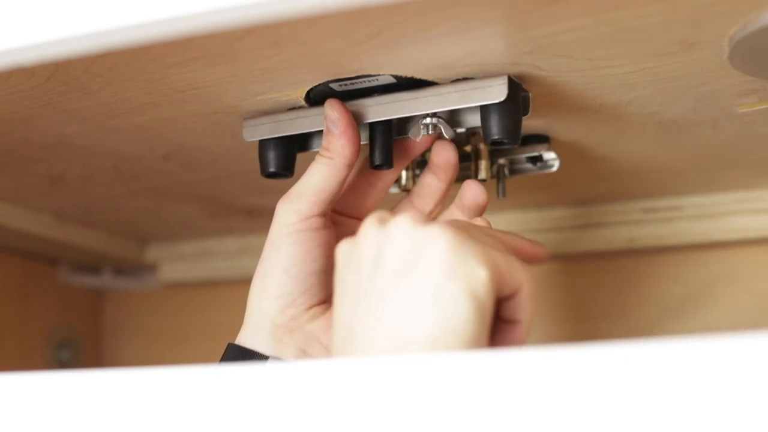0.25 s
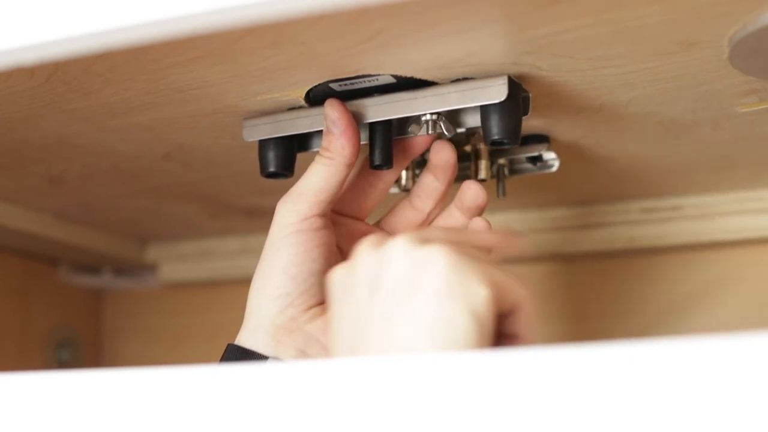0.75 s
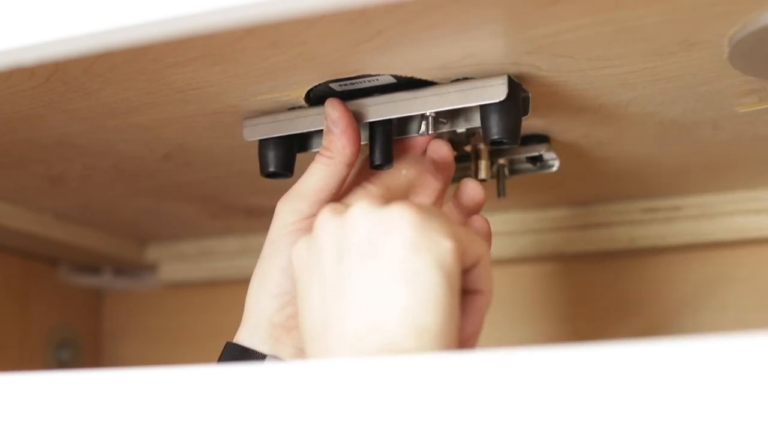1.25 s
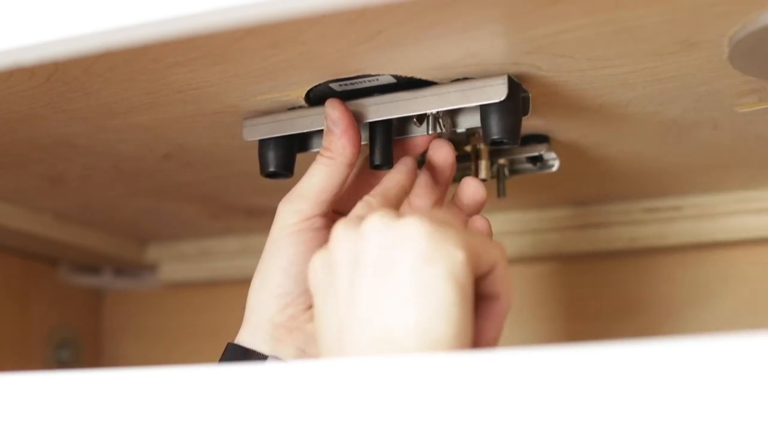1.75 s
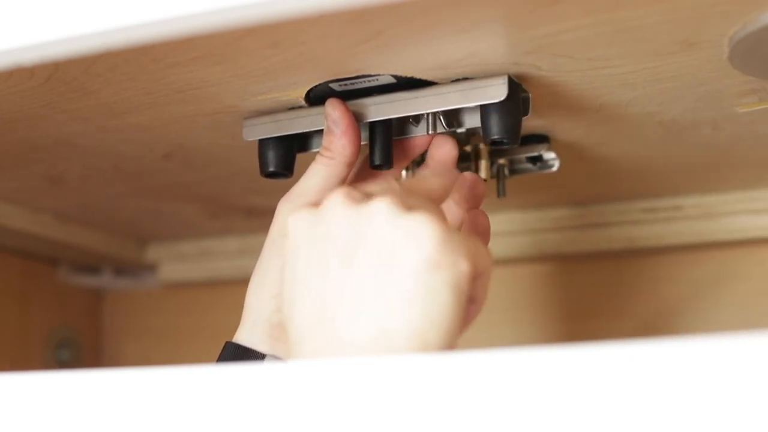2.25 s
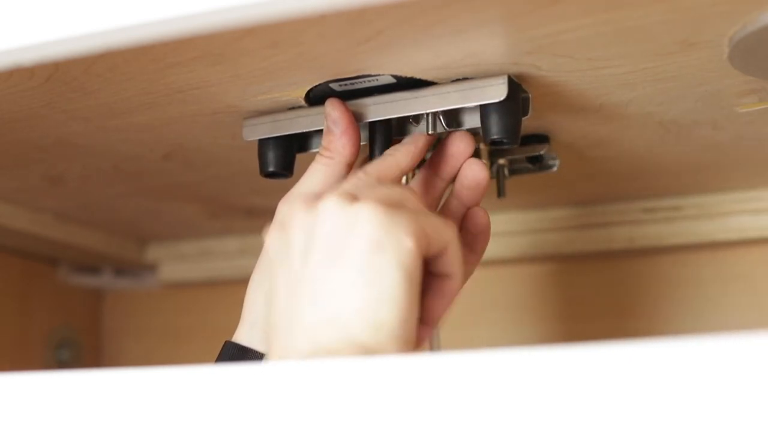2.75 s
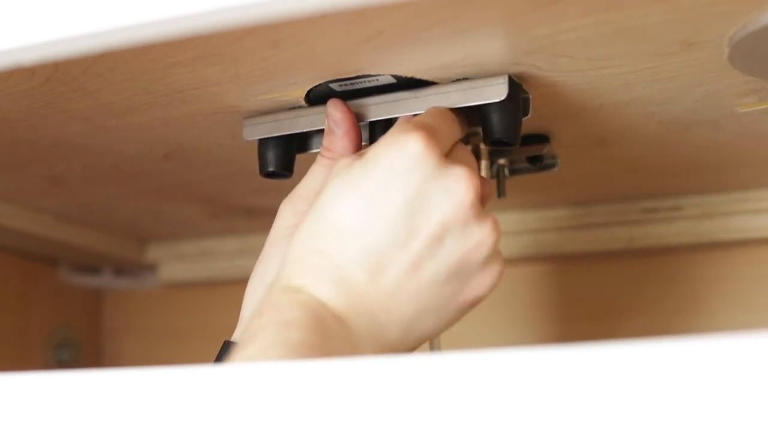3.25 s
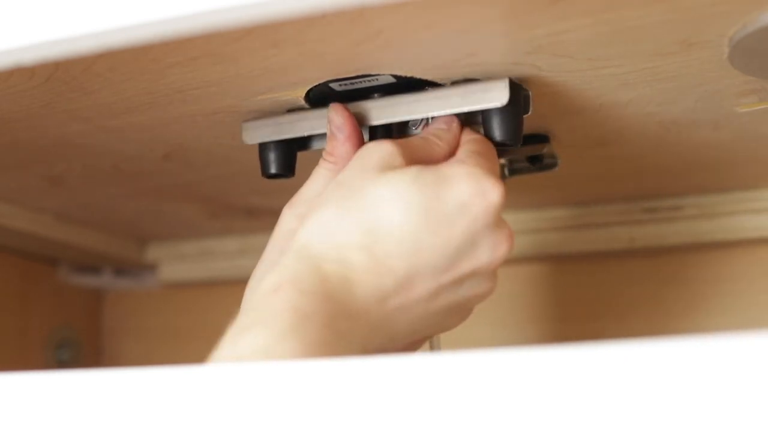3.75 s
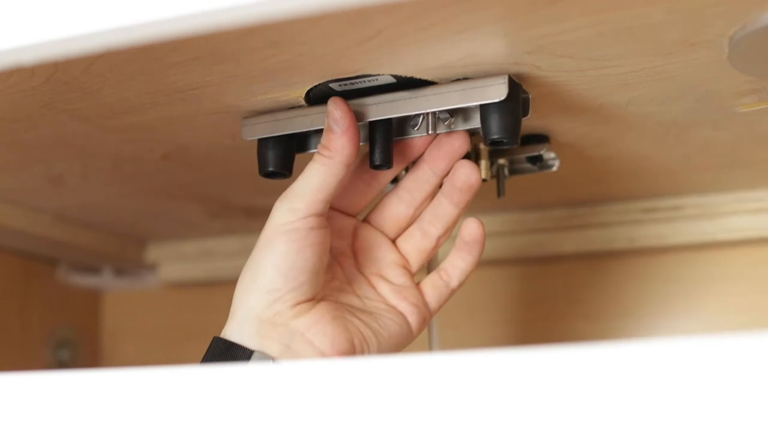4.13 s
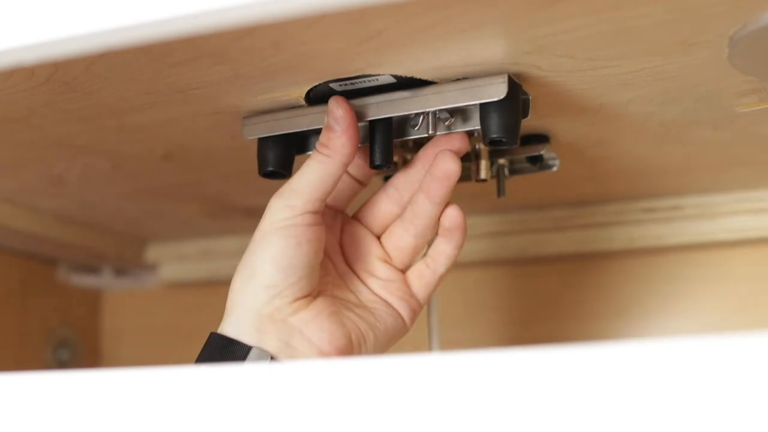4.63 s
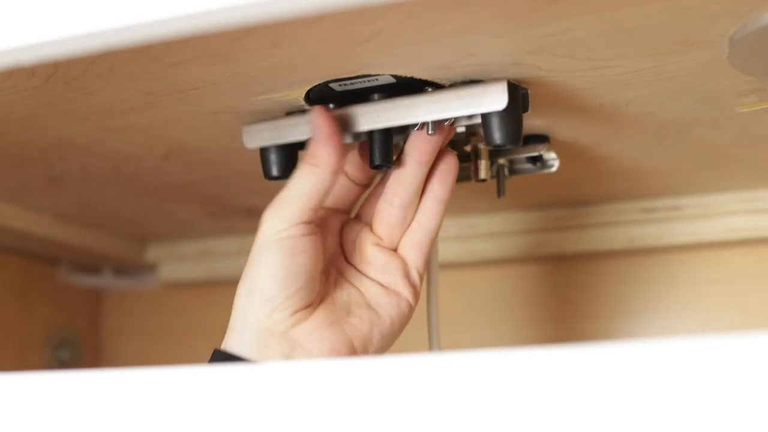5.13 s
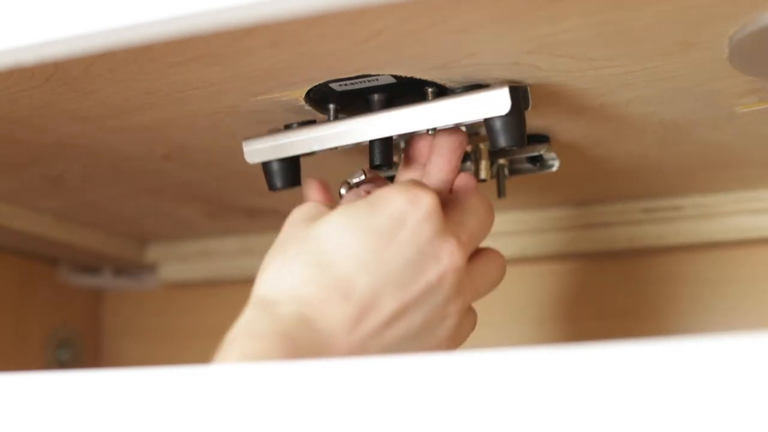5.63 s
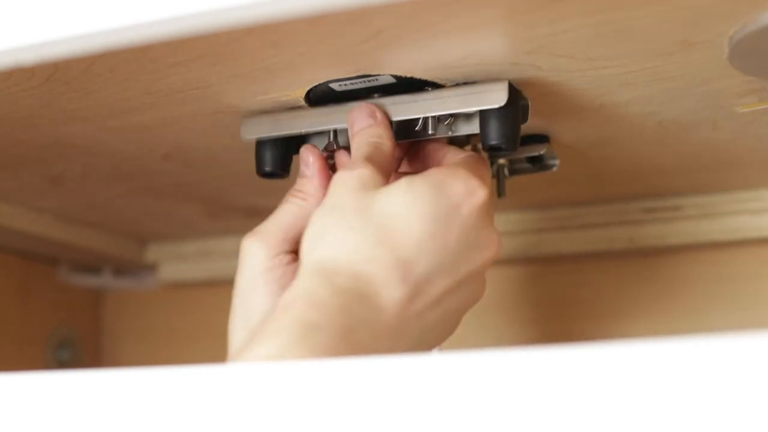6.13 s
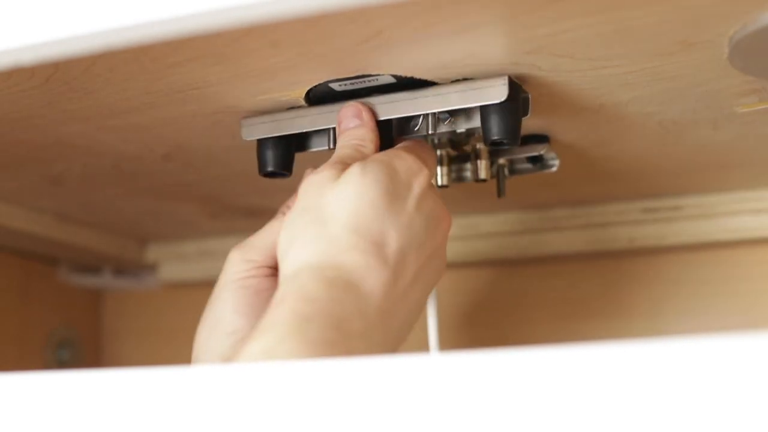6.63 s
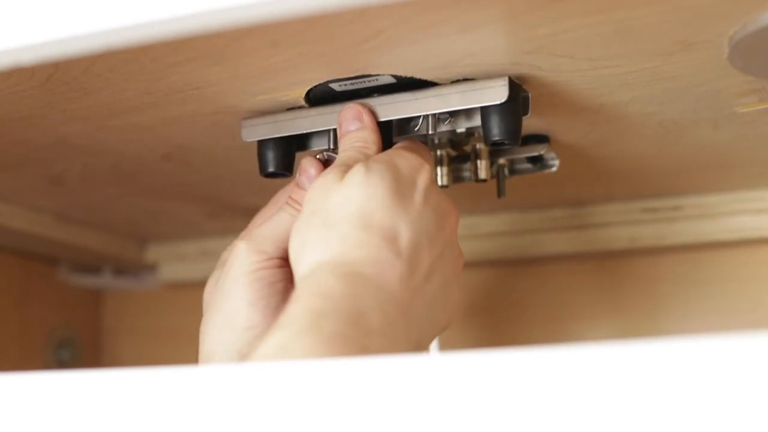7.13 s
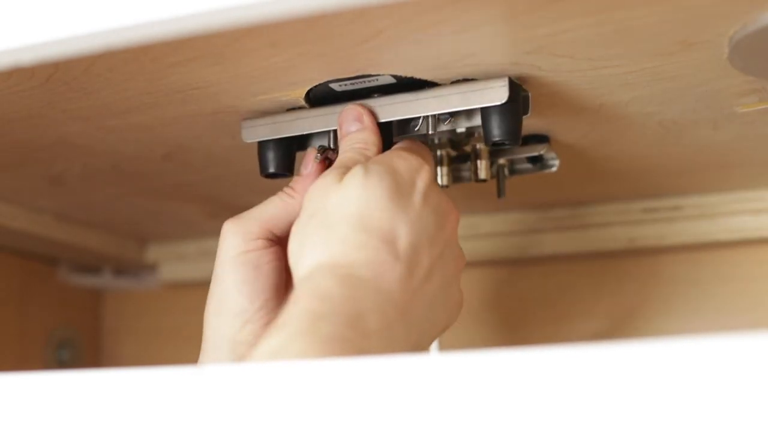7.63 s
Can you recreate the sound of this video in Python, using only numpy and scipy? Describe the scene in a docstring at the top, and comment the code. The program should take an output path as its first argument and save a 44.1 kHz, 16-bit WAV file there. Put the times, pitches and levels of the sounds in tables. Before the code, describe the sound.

A quiet room with faint low hum and slight hiss, heard close in mono with boxy wooden resonance. The tail of a nut rattle opens at 0 s. Flicks click at about 0.2 and 0.3 s, with a bright run coasting to 0.5 s; shorter metallic bursts follow near 0.7, 1.2, 1.6 and 2.1 s, with light knocks around 1.7 s. From 2.2 to 3.5 s there are mostly soft finger scuffs and faint taps. Hollow plate knocks cluster at 3.5-3.85 s, another lands at 4.25 s, then near quiet with light rubbing. From 5.1 to 6.3 s the loose plate clatters irregularly against wood, with dull hand thumps and scuffing, strongest at 6.2 s with quick rebounds. A softer knock comes at 6.5 s. Afterwards only faint clicks around 7.2-7.7 s, tiny nut movements, light scuffs and a modest knock at 7.85 s.

```python
"""A faint low hum in a quiet room and the brief rattle of a wing nut coasting, then flicks, more runs and knocks.
The nuts are spun by hand on the bolts of a steel mounting plate under a wooden cabinet top.
Flicked nuts click, gather speed and coast along the thread; hands bump and fingers scuff the hardware.
The loose plate knocks and rebounds on its bolts. Noise forces and tiny impacts drive resonant bodies of
wood and steel; the wooden panels sound along with every contact."""
import sys
import numpy as np
from scipy import signal
from scipy.fft import rfft, irfft
from scipy.io import wavfile

SR = 44100
rng = np.random.default_rng(int(sys.argv[2]) if len(sys.argv) > 2 else 0)


def generate_wav(sig):
    """Save sig (samples, or channels by samples) to the path in sys.argv[1] as 16-bit PCM at SR."""
    pcm = np.round(np.clip(np.atleast_2d(sig).T, -1, 1) * 32767).astype(np.int16)
    wavfile.write(sys.argv[1], SR, pcm)


N = 347508
TIME_S = np.arange(N) / SR

# nominal resonances of cabinet, wing nut, plate: (centre [Hz], width [Hz], rise over the colour [dB])
CABINET_MODES = [(297, 3.4, 9.5), (376.3, 21.4, 10.5), (438.8, 15, 18), (520, 11, -1), (662.8, 25.7, 14),
                 (720, 77, 6), (877, 17, 15.5), (1030, 30, 8.5), (1081.3, 28, 14), (1456, 87, 10.5),
                 (2013, 87, 4.5), (2347, 54, 6)]
NUT_MODES = [(2400, 100, 4), (4030, 56, 16.5), (5560, 110, 6), (5870, 45, 7), (6935, 38, 17.5),
             (7760, 100, 9), (8060, 110, 6), (9100, 100, 6), (11400, 130, 9), (11750, 90, 9),
             (12200, 80, 12.5), (12540, 90, 9), (13600, 70, 8), (15300, 60, 8), (15680, 70, 12)]
PLATE_MODES = [(1470, 55, 6), (1780, 47, 7), (2130, 70, 5), (3250, 73, 4), (3980, 88, 4), (5280, 150, 5),
               (5620, 45, 16), (6170, 95, 9), (6660, 60, 6), (6870, 50, 7), (7560, 140, 7), (11800, 140, 7),
               (12500, 300, 6), (13200, 65, 6), (14500, 180, 5), (15000, 190, 5)]
# broad responses of nut, plate, rubbed panel, rubbed steel, bumped panel, room: (frequency [Hz], relative level [dB])
NUT_COLOUR = [(60, -5.5), (190, -11), (400, -1), (800, 0.5), (1250, -8), (2400, -7), (3300, -9.5),
              (4300, -4), (4900, -10), (5700, -1), (8800, -3.5), (10200, -12.5), (11600, -5.5),
              (16000, -10)]
PLATE_COLOUR = [(60, -16), (190, -10), (400, -3), (750, -3.5), (1100, -13), (1700, -19), (2400, -21),
                (3200, -27), (4800, -28), (5900, -24.5), (7000, -27.5), (9500, -33), (16000, -30.5)]
RUB_COLOUR = [(60, -33), (200, 3.5), (420, -4.5), (900, -12), (1800, -11), (3500, -26), (6000, -28),
              (9000, -45), (16000, -29)]
WHISPER_COLOUR = [(300, -54), (1000, -0.5), (1500, 11.5), (2500, 6), (3600, -1), (4800, 0.5), (6200, -8),
                  (7800, -3), (9500, -22), (16000, 3)]
BUMP_COLOUR = [(25, -28.5), (60, -6), (92, -1.5), (120, -4), (185, -30.5), (230, -16), (400, -23.5),
               (1500, -75.5)]
ROOM_COLOUR = [(20, -22), (35, -6), (58, -5.5), (95, -3), (140, -19), (200, -23), (330, -27), (600, -29),
               (1200, -35.5), (2500, -41.5), (5000, -46), (16000, -48)]
# nut runs: (time at full speed [s], steel ring [dB], spin-up [s], coasting [s])
RUNS = [(0.0, -45.5, .02, 0.042), (0.233, -42.5, 0.015, .05), (0.291, -32.5, 0.074, 0.17),
        (0.714, -34.5, 0.043, 0.1), (1.169, -27.5, 0.034, 0.027), (1.614, -38, 0.067, 0.0033),
        (2.124, -33, 0.02, 0.013), (7.47, -55, 0.03, 0.022), (7.792, -59.5, 0.067, 0.0043)]
# finger flicks on a nut: (time [s], wood [dB], steel ring re wood [dB], panel pitch [Hz])
FLICKS = [(0.1744, -33.5, -2.5, 426), (0.284, -38, 11, 710), (0.328, -37.5, 3, 726), (0.396, -39, 0, 726),
          (0.612, -48.5, 3.5, 1030), (0.686, -53, 4.5, 1090), (0.707, -48.5, 9, 646),
          (1.0541, -48, 4.5, 450), (1.092, -43, 6.5, 405), (1.164, -28, -35, 640), (1.203, -36.5, 4.5, 930),
          (1.258, -42, -9, 670), (1.272, -50, 5.5, 670), (1.478, -41, -2, 400), (1.611, -43.5, 4, 1060),
          (2.113, -39, 0, 680), (2.14, -32, -16, 296), (6.4, -42, 9, 635), (6.419, -58, 22, 805),
          (7.168, -44, 6, 305), (7.186, -49.5, 3.5, 290), (7.338, -58, 3, 1140), (7.443, -46, 7.5, 660),
          (7.503, -67.5, 18, 370), (7.61, -55.5, -3, 650), (7.69, -57, -5.5, 656), (7.796, -45, -6, 650)]
# hand bumps against the mount: (time [s], level [dB])
HAND_BUMPS = [(0.282, -45.5), (1.169, -41), (1.627, -37), (2.137, -36.5), (3.61, -42), (3.724, -44),
              (3.831, -40.5), (5.256, -36.5), (5.645, -39.5), (5.801, -38.5), (6.078, -35), (6.183, -34),
              (6.242, -32.5), (7.172, -36.5), (7.239, -46), (7.848, -47.5)]
# finger strokes: (time at the firmest [s], length [s], panel [dB], steel [dB])
STROKES = [(1.323, 0.17, -45, -68), (1.45, .04, -56, -54), (1.897, 0.14, -53.5, -76.5),
           (2.246, 0.056, -48.5, -68), (2.45, 0.06, -57.5, -61), (3.094, 0.062, -57.5, -60),
           (3.165, 0.084, -53.5, -59.5), (3.327, 0.17, -63.5, -76), (3.431, 0.092, -50, -64),
           (3.603, 0.22, -49, -63.5), (3.89, 0.17, -60, -67), (4.06, 0.022, -75, -59),
           (4.701, 0.072, -56, -88), (4.763, 0.063, -59.5, -57.5), (4.825, 0.12, -63, -58.5),
           (5.1, 0.065, -58.5, -65), (5.722, 0.62, -46, -65), (6.852, 0.35, -71.5, -80.5),
           (7.613, .08, -51, -56.5), (7.695, 0.09, -56, -60), (7.79, .06, -52, -48.5)]
# plate knocks: (time [s], wood [dB], clack re wood [dB], steel ring re wood [dB], panel pitch [Hz], rebounds [count])
KNOCKS = [(1.665, -36.5, -13.5, -44, 655, 0), (1.68, -35.5, -15, -52, 680, 0),
          (1.845, -45, -6.5, -46, 327, 0), (2.397, -40.5, -20.5, -17, 420, 0), (2.526, -59, 1, -25, 378, 0),
          (2.548, -46.5, -8, -26.5, 430, 0), (2.824, -57.5, -6.5, -27, 370, 0),
          (3.484, -44.5, -23, -46, 534, 1), (3.603, -37, -11, -19, 765, 0),
          (3.699, -35.5, -26, -33, 440, 0), (3.722, -32.5, -37, -38, 660, 0),
          (3.7335, -26, -2, -14, 655, 0), (3.7405, -28, -10, -35, 740, 0), (3.816, -28, -22, -38, 386, 0),
          (3.845, -34.5, -28, -45, 315, 0), (4.241, -33, -5, -24.5, 770, 0),
          (4.423, -53.5, -14, -17, 810, 0), (5.14, -29.5, -14.5, -28.5, 710, 0),
          (5.228, -28, -12, -24, 614, 0), (5.238, -26, -3, -9.5, 860, 0), (5.259, -20.5, -10, -14, 523, 0),
          (5.5125, -22.5, -11.5, -21, 895, 2), (5.623, -28, -9.5, -23, 1030, 0),
          (5.643, -19, -14, -20.5, 401, 0), (5.711, -28, -20, -22, 646, 0),
          (5.725, -26, -9.5, -22.5, 1100, 0), (5.745, -25.5, -11.5, -20.5, 760, 0),
          (5.761, -27.5, -9.5, -19.5, 443, 0), (5.812, -33.5, -25.5, -31, 760, 0),
          (5.836, -34.5, -8.5, -10.5, 460, 0), (5.861, -33, -17.5, -20, 720, 0),
          (5.941, -43, -18, -26, 403, 0), (6.051, -27.5, -24, -37.5, 370, 0),
          (6.12, -34.5, -16, -22, 376, 0), (6.143, -29, -10, -22.5, 1045, 0),
          (6.179, -13.5, -11.5, -15, 680, 2), (6.224, -16.5, -15.5, -36, 940, 0),
          (6.236, -22, -10, -17.5, 940, 0), (6.256, -24, -11, -13, 855, 0),
          (6.2625, -23, -13.5, -33, 830, 0), (6.515, -30, -16.5, -38, 360, 1),
          (6.738, -55, -13.5, -33.5, 610, 0), (6.772, -53, -25, -36, 378, 0),
          (6.883, -53, -13, -28, 413, 0), (7.38, -49.5, -32, -34, 384, 1), (7.848, -33, -26, -39, 654, 1)]

# wood below, clack between, steel above
LOW_EDGE_HZ, HIGH_EDGE_HZ = 1200, 3400
CROSSOVER = [
    signal.butter(4, LOW_EDGE_HZ, "low", fs=SR, output="sos"),
    signal.butter(4, (LOW_EDGE_HZ, HIGH_EDGE_HZ), "band", fs=SR, output="sos"),
    signal.butter(4, HIGH_EDGE_HZ, "high", fs=SR, output="sos"),
]
TREBLE = signal.butter(2, 9500, "high", fs=SR, output="sos")
HARD_DB, SOFTENING = -33, 0.8  # steel level of a hard contact; top dB lost per dB softer

ROOM_DB, HUM_HZ, HUM_DB = -54, 62.3, -55.5
SPIN_UP_DB, COAST_DB_PER_S = 26, 66.5  # rise per spin-up time; loss to thread friction
STOP_T60_S, SPIN_WOOD_DB, WOOD_T60_S = 0.15, -0.5, 0.32  # steel after the stop; panel re steel, its ring-out
TURN_HZ, WOBBLE_DB = 27, 1.5  # an askew nut rattles harder once a turn
STROKE_EDGE_DB = 13  # drop from mid-stroke to either end
REBOUND_S, REBOUND_SCATTER, REBOUND_LOSS_DB = .0135, .1, 4  # gap, its relative spread, loss per rebound
TOP_HZ = 15850


def undb(db):
    """Decibels to gain."""
    return 10 ** (np.asarray(db) / 20)


def unit(x):
    """Scale to rms 1."""
    return x / np.sqrt(np.mean(x ** 2) + 1e-20)


def response(colour, modes=(), size=16384):
    """Causal (minimum-phase) impulse response of a body: broad colour, ringing resonances on top."""
    f_hz = np.maximum(np.arange(size // 2 + 1) * SR / size, 1)
    colour_hz, colour_db = np.transpose(colour)
    broad = undb(np.interp(np.log(f_hz), np.log(colour_hz), colour_db))
    peak_power = 1 + sum(undb(rise_db) ** 2 / (1 + (2 * (f_hz - centre_hz) / width_hz) ** 2)
                         for centre_hz, width_hz, rise_db in modes)
    cepstrum = irfft(np.log(broad * np.sqrt(peak_power)))
    # fold onto positive time
    cepstrum[1:size // 2] *= 2
    cepstrum[size // 2 + 1:] = 0
    return irfft(np.exp(rfft(cepstrum)))[:size // 2]


def through(x, body):
    """Send a force through an impulse response."""
    return signal.fftconvolve(x, body)[:len(x)]


def fade(t_s, t60_s):
    """Exponential decay, 60 dB down after t60_s."""
    return np.exp(-np.log(1000) * np.maximum(t_s, 0) / t60_s)


def add(out, time_s, sound):
    """Mix a sound in at a given time."""
    start = max(int(time_s * SR), 0)
    out[start:start + len(sound)] += sound[:max(N - start, 0)]


def wander(rate_hz):
    """Random levels joined by straight lines, rate_hz knots a second; spread near 1."""
    knots = rng.standard_normal(N // 100)
    return 1.38 * np.interp(TIME_S * rate_hz, np.arange(len(knots)), knots)


def room():
    """Low rumble and faint hiss from coloured noise, with a hum whose phase wavers a little."""
    air = unit(through(rng.standard_normal(N), response(ROOM_COLOUR)))
    hum = np.sqrt(2) * np.sin(2 * np.pi * HUM_HZ * TIME_S + 0.73 * wander(2.2))
    return undb(ROOM_DB) * air + undb(HUM_DB) * hum


def spin_gain(t60_s):
    """A nut gathers speed, coasts against friction, then stops and rings out."""
    gain = 0
    for full_speed_s, db, spin_up_s, coast_s in RUNS:
        t_s = TIME_S - full_speed_s
        coasting_s = np.clip(t_s, 0, coast_s)
        speed_db = SPIN_UP_DB * np.minimum(t_s / spin_up_s, 0) - COAST_DB_PER_S * coasting_s
        wobble_db = WOBBLE_DB * np.cos(2 * np.pi * TURN_HZ * coasting_s)
        run_gain = undb(db + speed_db + wobble_db) * fade(t_s - coast_s, t60_s)
        gain = np.maximum(gain, run_gain)
    return gain


def wing_ring(hits):
    """Impacts ring each wing mode; the contact point travels round the thread, feeding one, then another."""
    t_s = np.arange(SR // 4) / SR
    wings = 0
    for hz, width_hz, db in NUT_MODES:
        feed = undb(5 * np.clip(wander(35), -1.5, 1.5))
        ring = np.sin(2 * np.pi * hz * t_s) * np.exp(-np.pi * width_hz * t_s)
        wings = wings + undb(db) ** 2 / hz * unit(through(hits * feed, ring))
    return unit(wings)


def spins(impacts_per_s=520, scatter_db=5, clack_db=-3):
    """A spinning nut wobbles on the thread; its tiny random impacts ring the wings and the cabinet."""
    struck = rng.random(N) < impacts_per_s / SR
    strength = undb(scatter_db * np.clip(rng.standard_normal(N), -2, 2))
    hits = unit(struck * rng.choice([-1, 1], N) * strength)
    t_s = np.arange(SR // 4) / SR
    reflections = rng.standard_normal(len(t_s)) * (fade(t_s, .06) + undb(-26) * fade(t_s, .5))
    walls = unit(reflections) / np.sqrt(len(t_s))
    walls[0] += .8  # direct sound ahead of the cabinet's reflections
    rattle = through(through(hits, walls), response(NUT_COLOUR, CABINET_MODES + NUT_MODES))
    wood, clack, steel = (unit(signal.sosfilt(band, rattle)) for band in CROSSOVER)
    steel_gain = spin_gain(STOP_T60_S)
    wood_gain = undb(SPIN_WOOD_DB) * spin_gain(WOOD_T60_S)
    clack_gain = undb(clack_db) * np.sqrt(steel_gain * wood_gain)
    metal = unit(steel + .8 * wing_ring(hits))
    # a slow nut taps gently and loses its top
    top_gain = np.minimum(steel_gain / undb(HARD_DB), 1) ** SOFTENING
    metal = metal - (1 - top_gain) * signal.sosfiltfilt(TREBLE, metal)
    return steel_gain * metal + clack_gain * clack + wood_gain * wood


def contacts(rows, colour, metal_modes, t60s_s, room_dbs, room_t60_s, rises_s, grit_db, spot_db, chatter_s):
    """A contact chatters for a moment, then dies away in the cabinet, then the room; lows last longest."""
    out, t_s = np.zeros(N), np.arange(SR // 2) / SR
    attack = t_s < .02  # levels are set over this stretch
    for time_s, wood_db, clack_rel_db, steel_rel_db, panel_hz in rows:
        levels_db = wood_db, wood_db + clack_rel_db, wood_db + steel_rel_db
        # each contact lands on another spot, so other modes of metal and panel stand out
        struck = [(hz, width_hz, db - 1 + 2.5 * rng.standard_normal()) for hz, width_hz, db in metal_modes]
        spot = [(panel_hz, panel_hz / 6, spot_db)]
        # a gentle contact dulls above 8 kHz, more with each octave
        lost_db = SOFTENING * min(levels_db[-1] - HARD_DB, 0)
        softened = [(hz, db + lost_db * max(np.log2(hz / 8000), 0)) for hz, db in colour]
        body = response(softened, CABINET_MODES + struck + spot)
        force, grit = rng.standard_normal((2, len(t_s)))
        held_grit = np.repeat(grit, 16)[:len(t_s)]
        force = force * undb(grit_db * held_grit * fade(t_s, room_t60_s))
        for band, db, t60_s, room_db, rise_s in zip(CROSSOVER, levels_db, t60s_s, room_dbs, rises_s):
            swell = 1 - np.exp(-t_s / rise_s)
            cabinet_tail = fade(t_s - chatter_s, t60_s)
            room_tail = undb(room_db) * fade(t_s, room_t60_s)
            envelope = swell * np.hypot(cabinet_tail, room_tail)
            sound = signal.sosfilt(band, through(force * envelope, body))
            add(out, time_s, undb(db) * sound / np.std(sound[attack]))
    return out


def nut_clicks(clack_db=-1, finger_damping=1.44):
    """The light nut snaps across the play of its thread: short, bright, clack near midway from wood to steel."""
    # the finger still touches the wings and damps their ring
    modes = [(hz, width_hz * finger_damping, db - 2) for hz, width_hz, db in NUT_MODES]
    clicks = [(time_s, wood_db, steel_rel_db / 2 + clack_db, steel_rel_db, panel_hz)
              for time_s, wood_db, steel_rel_db, panel_hz in FLICKS]
    return contacts(clicks, NUT_COLOUR, modes, t60s_s=(.12, .1, .065), room_dbs=(-18, -22, -31),
                    room_t60_s=0.59, rises_s=(.002, .001, .0004), grit_db=1.0, spot_db=12, chatter_s=0.0025)


def bumps(t60_s=0.41):
    """Soft flesh only moves the lowest modes of the panel."""
    out, t_s = np.zeros(N), np.arange(SR // 2) / SR
    body = response(BUMP_COLOUR, [(94.5, 4.8, 1)])
    for time_s, db in HAND_BUMPS:
        thud = through(rng.standard_normal(len(t_s)) * fade(t_s, t60_s), body)
        # starts 8 ms ahead of the listed time; level set over the first 50 ms
        add(out, time_s - .008, undb(db) * thud / np.std(thud[:SR // 20]))
    return out


def rubs(grip_db=2.0):
    """Skin sticks and slips on the metal: the panel carries the scuffing and the steel whispers."""
    friction = rng.standard_normal(N) * undb(grip_db * wander(110))
    panel = unit(through(friction, response(RUB_COLOUR, CABINET_MODES)))
    steel = unit(through(friction, response(WHISPER_COLOUR, PLATE_MODES)))
    out = np.zeros(N)
    for firmest_s, length_s, panel_db, steel_db in STROKES:
        pressure = undb(-STROKE_EDGE_DB * (2 * (TIME_S - firmest_s) / length_s) ** 2)
        out += pressure * (undb(panel_db) * panel + undb(steel_db) * steel)
    return out


def plate_knocks():
    """The heavy plate drives the panel and rebounds, weaker each time: hollow, with a thin steel ring."""
    blows = []
    for time_s, wood_db, *timbre, rebounds in KNOCKS:
        gap_s = REBOUND_S * (1 + REBOUND_SCATTER * rng.standard_normal())
        for k in range(round(rebounds) + 1):
            blows.append((time_s + k * gap_s, wood_db - k * REBOUND_LOSS_DB, *timbre))
    return contacts(blows, PLATE_COLOUR, PLATE_MODES, t60s_s=(.1, .085, .065), room_dbs=(-19, -23, -30),
                    room_t60_s=0.55, rises_s=(.0018, .001, .0009), grit_db=0.0, spot_db=16, chatter_s=0.0027)


def scene():
    """Sum of all sources, one channel."""
    return (room() + spins() + nut_clicks() + bumps() + rubs() + plate_knocks())[None]


def record(dry):
    """The recorder cuts the top with a steep low-pass."""
    return signal.sosfilt(signal.ellip(10, .2, 80, TOP_HZ, fs=SR, output="sos"), dry)


dry = scene()
out = record(dry)
generate_wav(out)
```